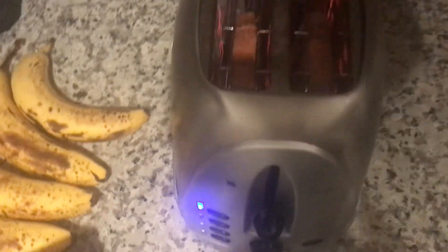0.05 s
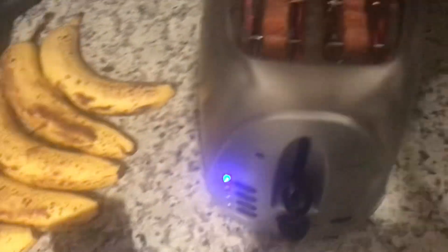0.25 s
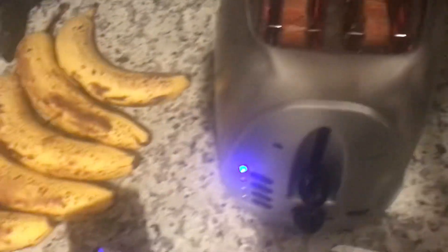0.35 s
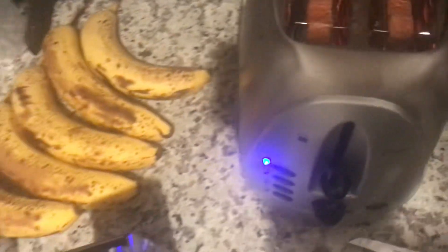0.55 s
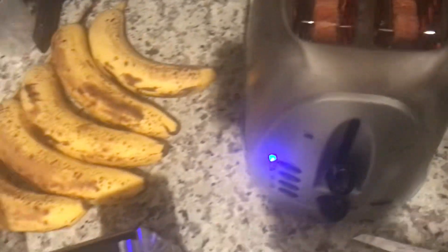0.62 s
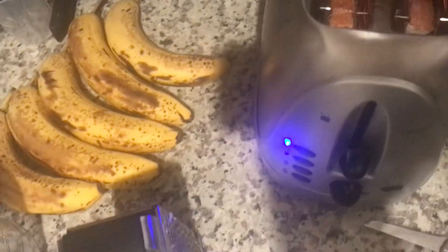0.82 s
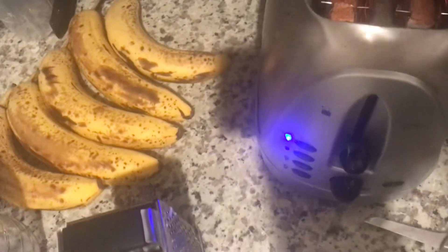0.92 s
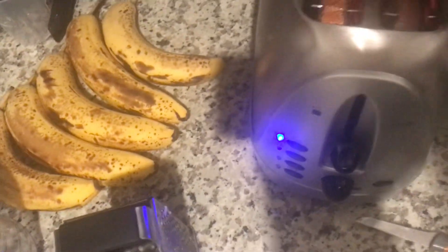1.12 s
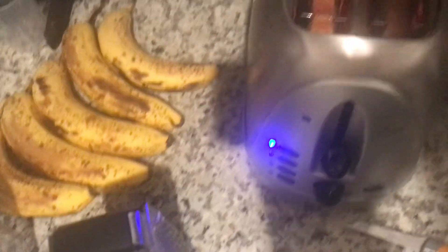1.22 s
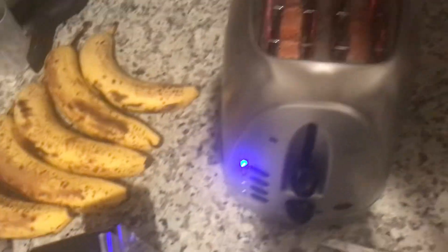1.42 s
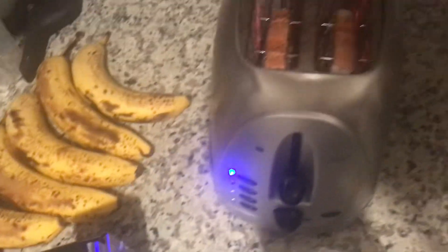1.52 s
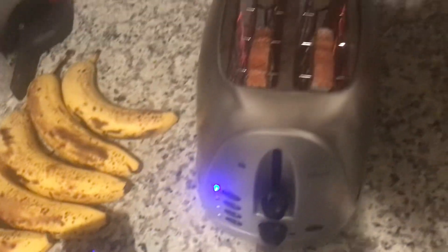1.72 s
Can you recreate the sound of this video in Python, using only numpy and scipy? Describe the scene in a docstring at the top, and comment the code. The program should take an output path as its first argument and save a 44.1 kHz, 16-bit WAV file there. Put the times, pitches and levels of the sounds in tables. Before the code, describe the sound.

Dry paper rustles and crackles in two pulls, with a hollow knock early on.

```python
"""A dry sheet, probably paper, is pulled along beside a toaster in a small, quiet kitchen, heard close up
in mono. It first stirs faintly over a low handling rumble. At 0.2 s knocks excite the damped modes of a
hollow body and creases begin to crunch and snap; soft bumps and a tiny stick-slip squeak follow. From 0.3 s
and again from 0.9 s, friction draws a stroke of crackle and hollow rubbing from the sheet, with more creases
on the way. Near 1.5 s light touches leave a faint high ring as the second stroke dies away."""
import sys
import numpy as np
from scipy import signal
from scipy.io import wavfile
from scipy.ndimage import uniform_filter1d

SR = 44100
rng = np.random.default_rng(int(sys.argv[2]) if len(sys.argv) > 2 else 0)


def unload_wav(signal):
    """Save mono or channel-first audio to the path in sys.argv[1] as 16-bit WAV at rate SR, clipped to [-1, 1]."""
    wavfile.write(
        sys.argv[1],
        SR,
        np.round(np.clip(np.atleast_2d(signal).T, -1, 1) * 32767).astype(np.int16),
    )


N = 77175
T = np.arange(N) / SR


def amp(db):
    """Amplitude ratio: a factor of ten per 20 dB."""
    return 10 ** (np.asarray(db) / 20)


def unit(x):
    """Normalisation to an rms of 1."""
    return x / np.sqrt(np.mean(x ** 2) + 1e-20)


def at_frequency(points, hz):
    """Interpolation on a logarithmic frequency axis."""
    f, value = np.transpose(points)
    return np.interp(np.log(hz + 1), np.log(f + 1), value)


def colour(x, spectrum, size=8192):
    """Minimum-phase filtering: the magnitude spectrum determines a causal response."""
    log_gain = np.log(amp(at_frequency(spectrum, abs(np.fft.fftfreq(size, 1 / SR)))))
    taps = np.fft.ifft(np.exp(np.conj(signal.hilbert(log_gain)))).real
    return signal.fftconvolve(x, taps[:size // 2])[:N]


def grains(spread_db, per_s=12000):
    """Shot noise: tiny slips are impulses of random time, sign and size."""
    size = amp(spread_db * np.minimum(rng.exponential(1, N), 4))
    return unit(size * rng.choice([-1., 1.], N) * (rng.random(N) < per_s / SR))


# Spectrum of the kitchen air (frequency [Hz], relative level [dB])
AIR_SPECTRUM = [(20, 10), (60, -7), (100, -1.5), (200, -12), (350, -15.5), (800, -19.5), (2000, -25),
                (5000, -24), (10000, -31), (16000, -24)]
def air(level_db=-58.5):
    """Stationary noise: the steady background of the room."""
    return amp(level_db) * unit(colour(rng.standard_normal(N), AIR_SPECTRUM))


# Envelope of the first rustle (time [s], level [dB])
STIR_ENVELOPE = [(0, -67.5), (.09, -67), (.19, -68), (.27, -64.5), (.36, -50), (.45, -85)]
# Its spectrum (frequency [Hz], relative level [dB])
STIR_SPECTRUM = [(100, -2), (400, 9), (1200, 4), (3000, 6), (6000, 5), (10000, 4.5), (16000, -3)]
def stir():
    """Friction noise: the sheet slips faintly before it is pulled."""
    envelope = amp(np.interp(T, *np.transpose(STIR_ENVELOPE)))
    return envelope * unit(colour(grains(spread_db=2.5), STIR_SPECTRUM))


# Envelope of the handling rumble (time [s], level [dB])
RUMBLE_ENVELOPE = [(0, -64), (.23, -70), (.28, -49), (.42, -51), (.5, -50), (.62, -58), (.72, -59),
                   (.8, -59.5), (.95, -60.5), (1.3, -66), (1.75, -68.5)]
# Its spectrum (frequency [Hz], relative level [dB])
RUMBLE_SPECTRUM = [(20, -8), (50, 7.5), (100, -0.5), (170, -2), (300, -23), (800, -80), (3000, -69)]
def rumble():
    """Amplitude-modulated noise: a low band swells and fades with the handling."""
    envelope = amp(np.interp(T, *np.transpose(RUMBLE_ENVELOPE)))
    return envelope * unit(colour(rng.standard_normal(N), RUMBLE_SPECTRUM))


# Impacts on a hollow body (time [s], level [dB], contact time [s], low-mode boost [dB])
IMPACTS = [(.2075, -38.5, 0.00034, 5.5), (0.234, -26.5, 0.0005, 0.5), (.2635, -41, 0.00052, 8.5),
           (0.4474, -15, 0.0012, 1.5), (.4615, -31.5, 0.00018, 2), (1.374, -48, .0005, 8.5)]
# Its modes (frequency [Hz], relative level [dB], decay time T60 [s])
BODY_MODES = [(159.7, -12.5, 0.11), (288, -11, 0.04), (368, -13.5, 0.062), (672, -4, 0.046),
              (746, -0.5, 0.026), (941, -14, 0.062), (1104, -5, 0.037), (1622, -2.5, 0.017)]
def knocks(low_modes_below_hz=450, rise_s=0.001):
    """Modal vibration: each impact rings the same damped modes; longer contact weakens the high ones."""
    out = np.zeros(N)
    for s, db, contact_s, boost_db in IMPACTS:
        t = np.maximum(T - s, 0)
        attack = 1 - np.exp(-t / rise_s)
        for hz, mode_db, t60 in BODY_MODES:
            start_db = db + mode_db + boost_db * (hz < low_modes_below_hz)
            decay = amp(start_db - 60 * t / t60) / (1 + (hz * contact_s) ** 2)
            out += attack * decay * np.sin(2 * np.pi * hz * t)
    return out


# Crushing creases (peak time [s], rise width [s], level [dB], spectral tilt [dB/octave])
CREASE_CLUSTERS = [(.208, 0.0016, -41.5, -2), (0.2317, 0.0014, -33, 4.5), (0.453, 0.0031, -33.5, -2),
                   (0.547, .004, -34.5, 0), (0.554, 0.0017, -32.5, 0.5), (0.594, 0.0014, -30, -1),
                   (0.656, 0.0036, -33.5, -1.5), (.801, 0.0026, -36, 8), (.945, 0.004, -43.5, 1),
                   (1.0304, 0.002, -33, -0.5), (1.049, 0.0014, -39, -5.5), (1.1682, 0.00053, -31.5, -2.5),
                   (1.181, 0.0018, -31, 10), (1.213, 0.0027, -36.5, -0.5), (1.362, 0.0024, -29, 8.5),
                   (1.399, 0.0026, -35.5, 4), (1.472, 0.00099, -41, 2.5), (1.478, 0.0019, -35.5, 6),
                   (1.584, .006, -55.5, 1)]
def crunches(corner_hz=600, fall_to_rise=2.35):
    """Impulse clusters: a crushed crease emits grains under a skewed Gaussian envelope."""
    out = np.zeros(N)
    for s, width, db, tilt in CREASE_CLUSTERS:
        spectrum = [(corner_hz / 4, -25), (corner_hz, 0), (SR / 2, tilt * np.log2(SR / 2 / corner_hz))]
        age = (T - s) / np.where(T < s, width, width * fall_to_rise)
        out += amp(db) * np.exp(-.5 * age ** 2) * unit(colour(grains(spread_db=1.5), spectrum))
    return out


# Single creases giving way (time [s], level [dB])
CREASE_SNAPS = [(.2312, -24), (.5843, -16), (.5901, -8.5), (.612, -23), (.635, -24), (.963, -22),
                (1.0300, -9), (1.0495, -24), (1.1680, -13.5), (1.4790, -24)]
# Spectrum of a snap (frequency [Hz], gain [dB])
SNAP_SPECTRUM = [(100, -22), (600, -1), (2000, 0), (6000, 1), (10000, -.5), (16000, -6)]
def snaps(dispersion=.55):
    """Dispersion: each crease releases one impulse, whose treble arrives just before its bass."""
    impulses = np.zeros(N)
    for s, db in CREASE_SNAPS:
        impulses[round(s * SR)] = amp(db)
    dispersed = signal.lfilter([-dispersion, 1], [1, -dispersion], impulses)  # all-pass
    return colour(dispersed, SNAP_SPECTRUM)


def early_reflections(x, decay_s=.003, level_db=-4, low_cut_hz=1200):
    """Scattering: quick reflections off the counter and toaster thicken each click."""
    t = T[:SR // 20]
    response = rng.standard_normal(len(t)) * np.exp(-t / decay_s)
    response = signal.sosfilt(signal.butter(2, low_cut_hz, "high", fs=SR, output="sos"), response)
    return x + amp(level_db) * signal.fftconvolve(x, response / np.linalg.norm(response))[:N]


# Soft handling bumps (time [s], level [dB], frequency [Hz], decay time T60 [s])
HANDLING_BUMPS = [(.262, -50, 65, .12), (0.296, -27.5, 226, 0.022), (0.301, -47, 74.4, 0.079),
                  (0.3298, -18.5, 257, 0.02), (0.34, -34, 80, 0.11), (0.423, -36, 75, 0.12),
                  (0.528, -47, 93, 0.25), (0.659, -42.5, 169, 0.12), (0.676, -43.5, 65.4, 0.23),
                  (0.811, -34.5, 170, 0.051), (0.821, -34, 87, 0.1), (0.833, -29, 236, 0.027),
                  (1.169, -34, 167, 0.042), (1.381, -61, 93, 0.2)]
def bumps(rise_s=0.0053):
    """Damped oscillation: each soft contact sets one low mode swinging."""
    out = np.zeros(N)
    for s, db, hz, t60 in HANDLING_BUMPS:
        t = np.maximum(T - s, 0)
        attack = 1 - np.exp(-t / rise_s)
        out += attack * amp(db - 60 * t / t60) * np.sin(2 * np.pi * hz * t)
    return out


# Pulses of the squeak (peak time [s], Gaussian width [s], level [dB], frequency [Hz])
SQUEAK_PULSES = [(0.28, .0025, -47.5, 2010), (.290, 0.0013, -37, 2000)]
def squeak():
    """Stick-slip oscillation: friction sustains a tone for a few milliseconds."""
    return sum(amp(db) * np.exp(-.5 * ((T - s) / width) ** 2) * np.sin(2 * np.pi * hz * T)
               for s, width, db, hz in SQUEAK_PULSES)


def resonate(x, hz, bandwidth_hz):
    """Forced response of a single resonance, scaled to an rms of 1."""
    pole = np.exp((-np.pi * bandwidth_hz + 2j * np.pi * hz) / SR)
    return unit(signal.lfilter([1], [1, -pole], x).real)


def drift(x, depth_db=3, patch_s=0.068, patch_hz=170):
    """Spectral modulation: random patches of gain shift the timbre as the sheet moves."""
    spectra = signal.stft(x, SR, nperseg=512)[2]
    patches = uniform_filter1d(rng.standard_normal(spectra.shape), round(patch_hz * 512 / SR), axis=0)
    patches = uniform_filter1d(patches, round(patch_s * SR / 256), axis=1)
    return signal.istft(spectra * amp(depth_db * unit(patches)), SR, nperseg=512)[1][:N]


# Envelopes of the two strokes (time [s], crackle level [dB], rubbing level [dB])
FIRST_PULL = [(0.31, -71, -53), (0.355, -46.5, -61), (0.4, -45, -49), (0.435, -38.5, -46.5),
              (0.49, -47.5, -49), (0.53, -39.5, -43.5), (0.575, -44.5, -40), (0.61, -41.5, -44.5),
              (0.68, -38, -55), (0.73, -35, -47), (0.78, -40, -47.5), (0.84, -43, -53.5),
              (0.895, -45.5, -53.5)]
SECOND_PULL = [(0.895, -49, -59), (0.95, -39.5, -48.5), (1.01, -38, -48.5), (1.06, -32.5, -44.5),
               (1.078, -33.5, -48.5), (1.12, -42.5, -51.5), (1.17, -36, -46.5), (1.26, -37.2, -47),
               (1.325, -39, -51), (1.36, -35, -51), (1.39, -48, -49), (1.45, -49, -56), (1.5, -56, -56.2),
               (1.56, -63, -70.5), (1.64, -87, -83)]
# Spectra of their crackle (frequency [Hz], relative level [dB])
FIRST_CRACKLE = [(200, -67), (700, -11.5), (1400, -4.5), (3000, 4.5), (4800, 2), (6800, 5.5), (10000, -0.5),
                 (16000, 1)]
SECOND_CRACKLE = [(200, -13), (700, -30), (1400, -23.5), (2700, 2), (4600, -3.5), (6500, 4.5), (8000, 2),
                  (9500, 6), (10600, 1.5), (12700, 4.5), (16000, 1)]
# Resonances under the rubbing (frequency [Hz], bandwidth [Hz], relative level [dB])
RUB_RESONANCES = [(296, 41, -3.5), (405, 33, -5.5), (555, 200, -2), (618, 72, -7), (746, 330, -1),
                  (946, 59, -3), (1034, 260, -4)]
def stroke(envelopes, spectrum, edge_s=.06, flutter_db=.6, flutter_s=0.0088):
    """Sliding friction: the same slips crackle and drive resonances, fluttering as the sheet catches."""
    s, crackle_db, rub_db = np.transpose(envelopes)
    gate = np.clip(np.minimum(T - s[0], s[-1] - T) / edge_s + .5, 0, 1) ** .5
    catching = unit(uniform_filter1d(rng.standard_normal(N), int(flutter_s * SR)))
    slips = grains(spread_db=2.5)
    crackle = unit(drift(colour(slips, spectrum))) * amp(np.interp(T, s, crackle_db))
    hollow = sum(amp(db) * resonate(slips, hz, width) for hz, width, db in RUB_RESONANCES)
    rub_band = signal.butter(2, [200, 1600], "band", fs=SR, output="sos")
    rub = unit(signal.sosfilt(rub_band, drift(hollow))) * amp(np.interp(T, s, rub_db))
    return gate * amp(flutter_db * catching) * (crackle + rub)


# Light touches (time [s], level [dB])
TOUCHES = [(1.478, -52), (1.579, -61), (1.590, -59)]
def tinks(hz=2610, t60=0.046):
    """Free decay: one faint, high mode rings after each touch."""
    ages = [(np.maximum(T - s, 0), db) for s, db in TOUCHES]
    return sum(amp(db - 60 * t / t60) * np.sin(2 * np.pi * hz * t) for t, db in ages)


# Reverberation of the kitchen (frequency [Hz], decay time T60 [s])
REVERB_TIMES = [(100, 0.39), (500, 0.24), (2000, 0.42), (8000, 0.078), (16000, 0.071)]
def kitchen(x, room_db, onset_s=0.005):
    """Reverberation: a short diffuse tail decays exponentially, its treble first."""
    t = T[:SR // 2]
    noise = rng.standard_normal(len(t)) * np.minimum(t / onset_s, 1)
    hz, age, spectra = signal.stft(noise, SR, nperseg=256)
    decay = amp(-60 * age / at_frequency(REVERB_TIMES, hz)[:, None])
    tail = signal.istft(spectra * decay, SR, nperseg=256)[1][:len(t)]
    return x + amp(room_db) * signal.fftconvolve(x, tail / np.linalg.norm(tail))[:N]


def scene():
    """Superposition: all sources add at one point, giving two identical channels."""
    rustle = stir() + stroke(FIRST_PULL, FIRST_CRACKLE) + stroke(SECOND_PULL, SECOND_CRACKLE)
    contacts = rumble() + knocks() + bumps() + squeak() + tinks()
    creases = crunches() + early_reflections(snaps())
    mono = air() + kitchen(rustle, room_db=-15)
    mono += kitchen(contacts, room_db=-13) + kitchen(creases, room_db=-7)
    return np.array([mono, mono])


def record(dry, bass_hz=42, treble_hz=15790):
    """Band limiting: the microphone rolls off the bass, and a steep low-pass ends the treble."""
    x = signal.sosfilt(signal.butter(4, bass_hz, "high", fs=SR, output="sos"), dry)
    low_pass = signal.firwin(511, treble_hz, window=("kaiser", 9), fs=SR)
    return signal.oaconvolve(x, low_pass[None], "same")


dry = scene()
out = record(dry)
unload_wav(out)
```